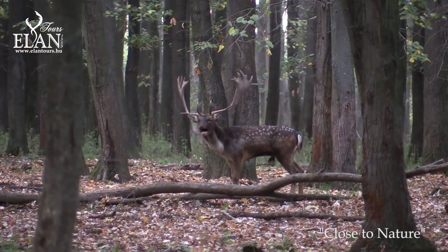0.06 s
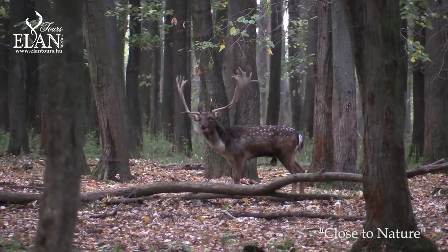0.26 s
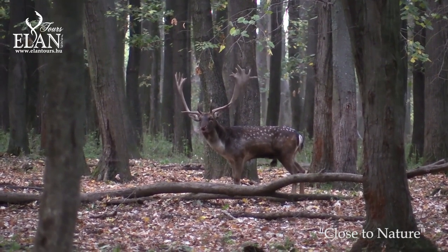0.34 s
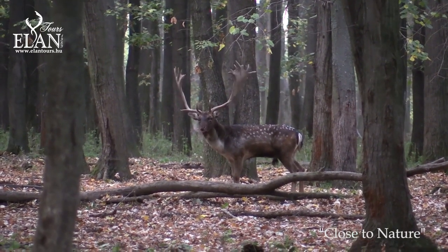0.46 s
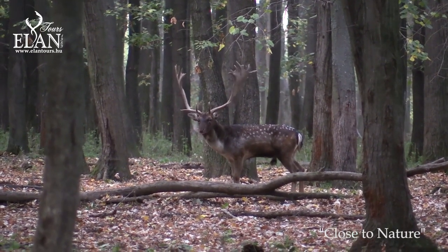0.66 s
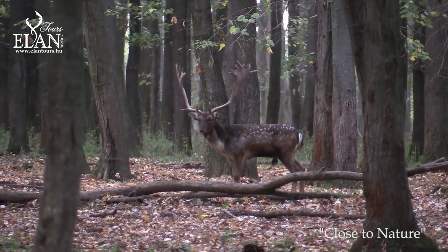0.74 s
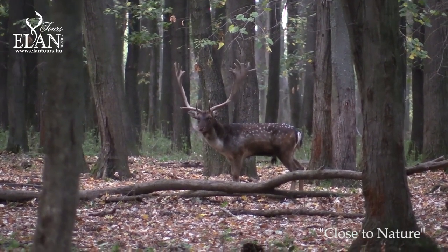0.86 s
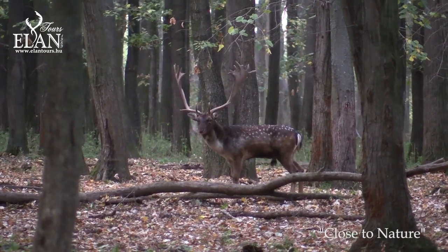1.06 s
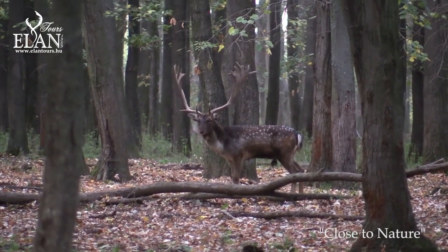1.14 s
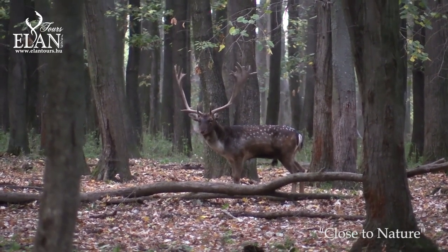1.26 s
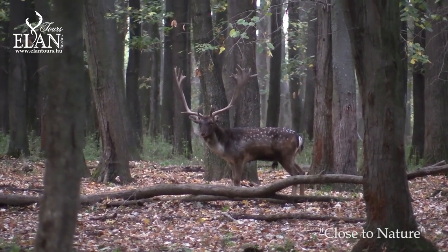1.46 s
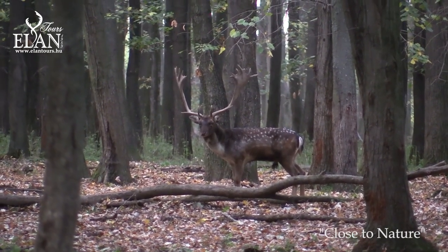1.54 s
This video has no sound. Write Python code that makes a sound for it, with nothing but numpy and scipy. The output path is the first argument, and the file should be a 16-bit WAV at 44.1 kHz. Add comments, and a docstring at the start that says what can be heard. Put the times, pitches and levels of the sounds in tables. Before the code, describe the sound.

A deer gives one short, low rattling groan some way off, straight ahead of the microphone in a forest. It echoes faintly among the trees over a steady hiss and a far drone, then leaves rustle softly.

```python
"""Fallow buck in a forest

One short rattling groan, some way off and straight ahead of a stereo pair of microphones.
His vocal folds slap a dozen separate times into a long throat whose resonances sink as it stretches.
Trunks scatter each slap and the wood rings on. All round lie a steady hiss, a far drone and,
towards the end, a soft rustle of leaves."""
import sys
import numpy as np
from scipy import signal
from scipy.fft import rfft, irfft
from scipy.io import wavfile

SR = 44100
rng = np.random.default_rng(int(sys.argv[2]) if len(sys.argv) > 2 else 0)


def unload_wav(signal):
    """Save mono or channel-first audio to the path in sys.argv[1] as 16-bit WAV at rate SR, clipped to [-1, 1]."""
    wavfile.write(
        sys.argv[1],
        SR,
        np.round(np.clip(np.atleast_2d(signal).T, -1, 1) * 32767).astype(np.int16),
    )


N = 70560
TIME = np.arange(N) / SR
FREQS = np.maximum(np.fft.rfftfreq(N, 1 / SR), 1)


def from_db(db):
    """Decibels to gain."""
    return 10 ** (np.asarray(db) / 20)


def rms_one(x):
    """Scale to unit rms."""
    return x / np.sqrt(np.mean(x ** 2) + 1e-20)


def at_hz(points, hz):
    """Read a table on a log-frequency axis."""
    f, value = np.transpose(points)
    return np.interp(np.log(hz), np.log(f), value)


def fader(points):
    """Gain over time from rows of (time [s], level [dB])."""
    return from_db(np.interp(TIME, *np.transpose(points)))


def lowpass(x, hz, order=2):
    """Butterworth low-pass."""
    return signal.sosfilt(signal.butter(order, hz, fs=SR, output="sos"), x)


def ring(x, hz, width_hz):
    """A resonance applied twice, so that it swells briefly and has steep skirts; gain 1 on top."""
    radius, angle = np.exp(-np.pi * width_hz / SR), 2 * np.pi * hz / SR
    gain = (1 - radius ** 2) / 2
    section = [gain, 0, -gain, 1, -2 * radius * np.cos(angle), radius ** 2]
    return signal.sosfilt([section] * 2, x + 1e-18)


# Likeness of the two microphones for sound from all round: (frequency [Hz], correlation [-1..1])
MIC_LIKENESS = [(60, -0.02), (92, 0.07), (140, 0.06), (210, -0.07), (330, -0.57), (500, -0.59),
                (770, -0.75), (1170, -0.64), (1790, -0.25), (2740, -0.15), (4190, -0.09), (6410, 0.08),
                (9810, 0.16), (15000, 0.14)]


def diffuse(spectrum=None):
    """Noise reaching the pair from all round, white or shaped by (frequency [Hz], level [dB])."""
    gain = 1 if spectrum is None else from_db(at_hz(spectrum, FREQS))
    mid, side = rfft(rng.standard_normal((2, N)))
    alike = at_hz(MIC_LIKENESS, FREQS)
    left_right = np.sqrt(1 + alike) * mid + np.sqrt(1 - alike) * side * [[1], [-1]]
    return irfft(gain * left_right / np.sqrt(2), N)


# A drone far off among the trees: (frequency [Hz], width [Hz], level [dB])
DRONE_BANDS = [(440, 89, -73), (624, 124, -62), (1100, 90, -61.5)]
# Its swell: (time [s], gain [dB])
DRONE_SWELL = [(0, -1), (.5, 12.5), (1.0, 3), (1.3, -1), (1.6, -3.5)]


def far_drone():
    """Three narrow bands of noise swell and sink together."""
    bands = sum(from_db(db) * rms_one(ring(diffuse(), hz, width)) for hz, width, db in DRONE_BANDS)
    return fader(DRONE_SWELL) * bands


# Forest air round the microphones: (frequency [Hz], relative density [dB])
AIR_SPECTRUM = [(15, -16), (25, -17), (101, -15.5), (140, -18.5), (281, -11), (331, -14), (389, -8.5),
                (552, -14), (598, -11.5), (945, -3), (1110, -2.5), (1340, -5.5), (1660, -7), (4150, -12),
                (15500, -27)]


def air_hiss(level_db=-53):
    """The steady, even hiss of the place."""
    return from_db(level_db) * rms_one(diffuse(AIR_SPECTRUM))


# The buck's vocal folds, some way off: (time [s], closing snap [dB], opening throb [dB], bright ring [Hz])
FOLD_SLAPS = [(0.1775, -42.5, -45, 3020), (0.2008, -41, -34, 2280), (.2322, -31, -35, 3300),
              (.2586, -31, -28.5, 3600), (0.2783, -29, -53, 3295), (0.3095, -25.5, -26, 3530),
              (0.3332, -29, -28.5, 3304), (.3660, -24, -33, 3334), (.3880, -30.5, -38.5, 3240),
              (.4180, -37, -37, 2240), (.4498, -31, -60, 3200), (.4940, -51, -33.5, 3300)]
# His throat: (frequency at first [Hz], stretched [Hz], width [Hz], gain at first [dB], stretched [dB])
THROAT_RESONANCES = [(265, 240, 133, -28.5, -22.5), (477, 483, 87, -17.5, -19), (752, 672, 116, -14.5, -12),
                     (1173, 1145, 63.6, -8.5, -6.5), (1652, 1100, 104, -5.5, -12.5),
                     (2106, 1833, 158, -8, -11), (2254, 2060, 134, -2, -8), (2500, 2330, 144, -15, -10),
                     (2870, 2700, 150, -6, -7), (3196, 2400, 150, 1, -7), (3580, 3580, 174, -4.5, -2.5),
                     (4460, 4600, 660, -17, -7)]
STRETCH_START_S, STRETCH_S = .225, .0612
OPENING_LEAD_S, OPENING_CUT_HZ = .0062, 2130
PUFF_DB, PUFF_DECAY_S = -3.5, .0029   # air rushing through; level relative to the snap
RING_WIDTH_HZ, RING_FIRST_DB, RING_STRETCHED_DB = 500, -6.5, -1   # levels relative to the snap
SNAP_LOW_CUT_HZ, MOUTH_CUT_HZ = 880, 4970


def buck_groan(size=4096):
    """Each slap is a dull opening, a sharp closing and a puff of air, all ringing in the throat."""
    groan = np.zeros(N + size)
    lead = int(OPENING_LEAD_S * SR)
    opening, closing = signal.unit_impulse(size), signal.unit_impulse(size, lead)
    puff_shape = np.exp(-abs(TIME[:size] - lead / SR) / PUFF_DECAY_S)
    for time_s, snap_db, throb_db, ring_hz in FOLD_SLAPS:
        puff = rng.standard_normal(size) * puff_shape
        snap = from_db(snap_db) * (closing + from_db(PUFF_DB) * puff / np.linalg.norm(puff))
        thin_snap = snap - lowpass(snap, SNAP_LOW_CUT_HZ, order=1)
        throb = from_db(throb_db) * lowpass(opening, OPENING_CUT_HZ)   # feeds the low resonances
        stretch = np.clip((time_s - STRETCH_START_S) / STRETCH_S, 0, 1)
        bright = ring(closing, ring_hz, RING_WIDTH_HZ)
        bright_db = snap_db + RING_FIRST_DB + stretch * (RING_STRETCHED_DB - RING_FIRST_DB)
        voice = from_db(bright_db) * bright / abs(bright).max()
        for first_hz, last_hz, width_hz, first_db, last_db in THROAT_RESONANCES:
            hz = first_hz + stretch * (last_hz - first_hz)
            gain = from_db(first_db + stretch * (last_db - first_db)) * SR / (2 * np.pi * width_hz)
            voice += gain * ring(thin_snap + throb, hz, width_hz)
        start = int(time_s * SR) - lead
        groan[start:start + size] += voice
    return lowpass(groan[:N], MOUTH_CUT_HZ, order=6)


# Scatter off nearby trunks and ground: (frequency [Hz], gain [dB])
TRUNK_SCATTER = [(300, -10), (1100, -6.5), (2200, 2.5), (3500, -2), (6000, -10)]
# The ring of the wood farther out: (frequency [Hz], gain [dB])
WOOD_SPECTRUM = [(200, 0), (600, 10), (1100, 5.5), (2000, 8.5), (3300, -8.5), (5000, -15)]
# How long it hangs on: (frequency [Hz], time to fall 60 dB [s])
WOOD_DECAY = [(200, 0.3), (600, 1.85), (1100, 2.15), (2000, 1.14), (3300, 1.54), (6000, 0.43)]


def forest_echoes(call, scatter_t60_s=.13, build_s=.011):
    """Quick scatter from the nearest trunks, then a tail that builds up and dies band by band."""
    scatter_fade = from_db(-60 * TIME / scatter_t60_s)
    echoes = diffuse(TRUNK_SCATTER) * scatter_fade / np.linalg.norm(scatter_fade)
    wood = rfft(diffuse(WOOD_SPECTRUM))
    build = 1 - np.exp(-TIME / build_s)
    for hz in 125 * 2 ** np.arange(0, 6.5, .5):   # half-octave bands
        band = np.clip(1 - 2 * abs(np.log2(FREQS / hz)), 0, 1)
        tail = build * from_db(-60 * TIME / at_hz(WOOD_DECAY, hz))
        echoes += irfft(wood * band, N) * tail / np.linalg.norm(tail)
    return signal.fftconvolve(call[None], echoes, axes=1)[:, :N]


# Leaves on all sides of the microphones: (frequency [Hz], relative density [dB])
LEAF_SPECTRUM = [(600, -17), (1300, -14.5), (1950, 1.5), (3000, -7), (4500, -11.5), (8000, -19),
                 (15000, -35)]
# Their stirring: (time [s], level [dB])
LEAF_LEVEL = [(0, -92), (.95, -65), (1.1, -56.5), (1.22, -69), (1.38, -64), (1.48, -54.5), (1.55, -54),
              (1.6, -56)]


def leaf_rustle():
    """Leaves begin to rustle, in two soft swells after the groan."""
    return fader(LEAF_LEVEL) * rms_one(diffuse(LEAF_SPECTRUM))


def scene():
    """The buck straight ahead, the forest all round."""
    buck = buck_groan()
    return buck + forest_echoes(buck) + far_drone() + air_hiss() + leaf_rustle()


def record(dry):
    """The recorder cuts the top steeply."""
    cutoff_hz = 15750
    return signal.sosfilt(signal.ellip(12, .1, 70, cutoff_hz, fs=SR, output="sos"), dry)


dry = scene()
out = record(dry)
unload_wav(out)
```